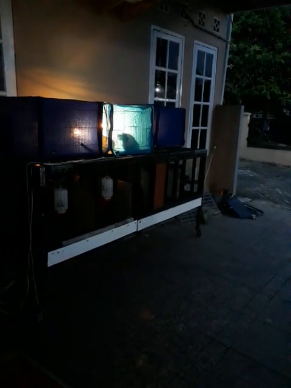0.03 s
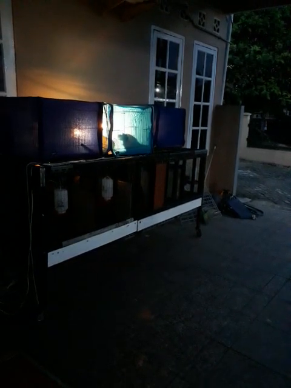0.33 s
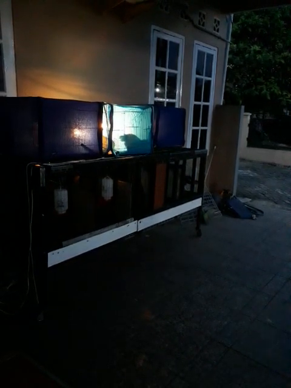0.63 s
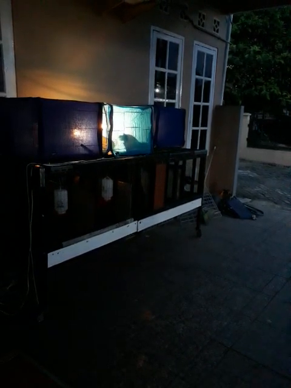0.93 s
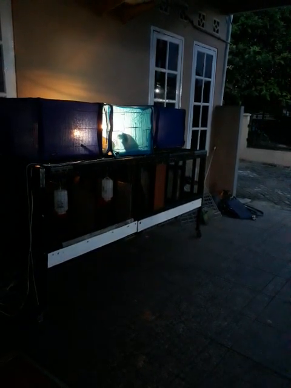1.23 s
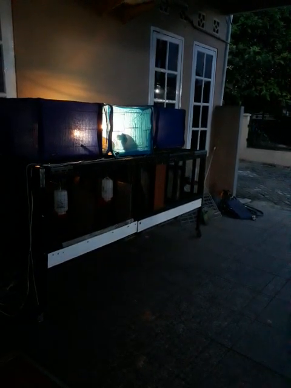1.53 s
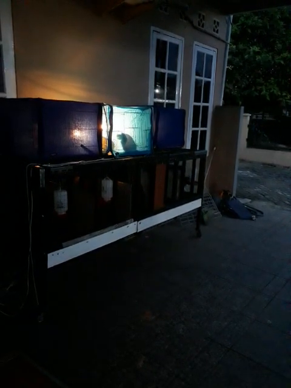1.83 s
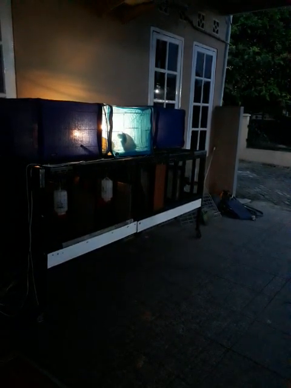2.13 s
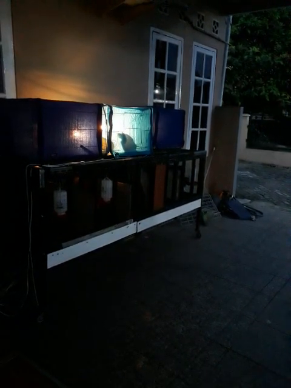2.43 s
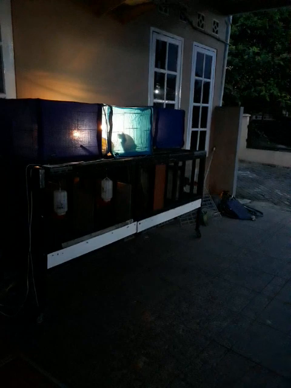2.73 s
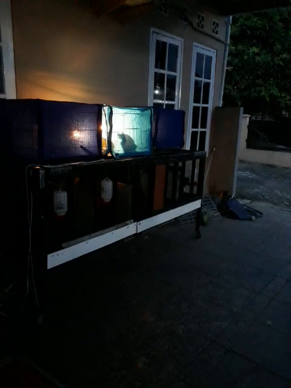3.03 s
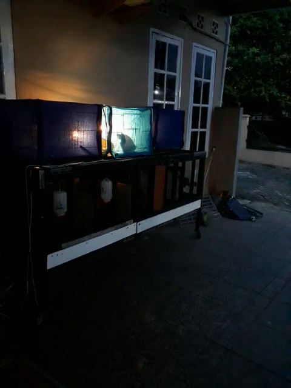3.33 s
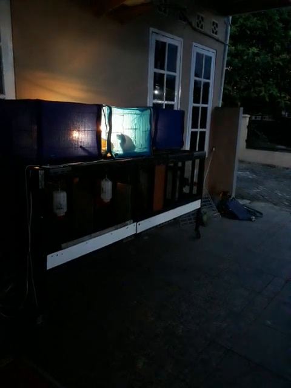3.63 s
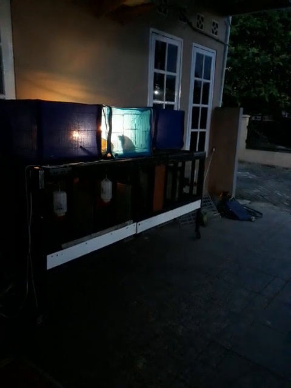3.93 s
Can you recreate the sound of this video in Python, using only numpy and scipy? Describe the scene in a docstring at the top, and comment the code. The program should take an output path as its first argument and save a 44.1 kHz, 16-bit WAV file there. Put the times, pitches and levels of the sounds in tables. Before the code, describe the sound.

Roosters crow in short rising calls, then a close one bursts in, loud and raspy.

```python
"""Roosters crowing in covered cages on a porch, heard from one microphone. One gives a stuttering crow of
five rising syllables, each hoarse at the start, while a farther bird crows lower in between. After some
scratching and a cluck, a rooster close to the microphone bursts in, squeaking and rasping. Each voice is
a syrinx sounding through a throat. Wall and roof ring over a steady bed of distant traffic."""
import sys
import numpy as np
from scipy import signal
from scipy.fft import rfft, irfft
from scipy.io import wavfile
from scipy.ndimage import uniform_filter1d, minimum_filter1d

SR = 44100
rng = np.random.default_rng(int(sys.argv[2]) if len(sys.argv) > 2 else 0)


def store_pcm(level_fs):
    """Save levels as 16-bit WAV."""
    pcm = np.round(np.clip(level_fs, -1, 1) * 32767).astype(np.int16)
    wavfile.write(sys.argv[1], SR, np.atleast_2d(pcm).T)


N = 176400  # 4 s
ATTACK_S, RELEASE_S = 0.0031, 0.02
BAND_LIMIT_HZ = 15700

# Spectrum of the rasp in every voice but the nearest: frequency_hz, relative_db
RASP_SPECTRUM = [(150, -51), (500, -22), (800, 4), (1200, -6), (1500, -8), (2100, 2), (2700, -8.5),
                 (3500, 4), (4100, -16.5), (5000, -5), (7000, -15), (10000, -41), (14500, -37.5)]


def amp(db):
    """Decibels to gain."""
    return 10 ** (np.asarray(db) / 20)


def unit_rms(x):
    """Scales a signal to rms 1."""
    return x / np.sqrt(np.mean(x ** 2) + 1e-20)


def value_at(points, hz):
    """Reads a table on a log-frequency axis."""
    f, value = np.transpose(points)
    return np.interp(np.log(hz + 1), np.log(f + 1), value)


def add(mix, start_s, sound):
    """Mixes a sound in at a time."""
    part = mix[max(round(start_s * SR), 0):][:len(sound)]
    part += sound[:len(part)]


def colour(x, spectrum):
    """Filters a sound by a spectrum in dB and scales it to rms 1."""
    gains = amp(value_at(spectrum, np.fft.rfftfreq(len(x), 1 / SR)))
    return unit_rms(irfft(rfft(x) * gains, len(x)))


def wander(size, hz):
    """Smooth random motion up to a rate, at about rms 1."""
    f = np.fft.rfftfreq(N, 1 / SR)
    return unit_rms(irfft(rfft(rng.standard_normal(N)) / (1 + (f / hz) ** 4), N))[:size]


def gate(t, start_s, end_s):
    """A note's quick onset and softer release."""
    return np.clip((t - start_s) / ATTACK_S, 0, 1) * np.clip((end_s - t) / RELEASE_S, 0, 1)


def yard():
    """Distant traffic rumble and a thin hiss, slightly unsteady in level."""
    # Outdoor background: frequency_hz, relative_db
    spectrum = [(20, -61), (45, -15), (75, -7), (101, -1), (188, 0), (368, -6.5), (482, -11), (570, -15.5),
                (900, -16), (1400, -20), (2150, -14), (2800, -24), (4100, -20.5), (5150, -19), (5800, -9.5),
                (6550, -24), (7400, -30.5), (8350, -21.5), (8900, -35), (9700, -55), (15500, -52)]
    level_db = -43.5 + .5 * wander(N, hz=12)
    return amp(level_db) * colour(rng.standard_normal(N), spectrum)


def syrinx(curve, throat, rasp, jitter, rasp_db, half_db, shimmer_db, beak=0):
    """Harmonics and weaker half-harmonics through a throat; roughness shakes the cycles and adds rasp."""
    times, *controls = np.transpose(curve)
    t = np.arange(times[0], times[-1], 1 / SR)
    hz, level_db, rough = (np.interp(t, times, control) for control in controls)
    rough, size = np.clip(rough, 0, 1), len(t)
    shake = jitter * rough * wander(size, hz=267) + 0.0046 * wander(size, hz=62)
    phase = 2 * np.pi * np.cumsum(hz * (1 + shake)) / SR
    multiples = np.arange(2, 36)[:, None] / 2
    partial_hz = multiples * hz
    beak_shift = (1051 / hz) ** beak  # with beak > 0 the throat's resonances sink as the pitch falls
    partial_db = value_at(throat, partial_hz * beak_shift) + half_db * (multiples % 1 > 0)
    gains = amp(partial_db) * (partial_hz < BAND_LIMIT_HZ)
    tone = (gains * np.cos(multiples * phase + multiples ** 2)).sum(0)
    tone /= np.sqrt((gains ** 2).sum(0) / 2)
    puffs = colour((1 + .7 * np.cos(phase)) * rng.standard_normal(N)[:size], rasp)  # one per cycle
    rasp_gain = amp(rasp_db) * rough ** 1.41
    voice = (tone + rasp_gain * puffs) / np.sqrt(1 + rasp_gain ** 2)
    shimmer = amp(shimmer_db * rough * wander(size, hz=110))
    return times[0], voice * shimmer * gate(t, times[0], times[-1]) * amp(level_db)


def fundamental(curve, flutter):
    """The lowest partial of a crow stays nearly pure even where the overtones break up."""
    times, pitch_hz, _, rough, level_db = np.transpose(curve)
    t = np.arange(times[0], times[-1], 1 / SR)
    shake = flutter * np.interp(t, times, rough) * wander(len(t), hz=113)
    hz = np.interp(t, times, pitch_hz) * (1 + shake)
    tone = np.sqrt(2) * np.sin(2 * np.pi * np.cumsum(hz) / SR)
    return times[0], tone * gate(t, times[0], times[-1]) * amp(np.interp(t, times, level_db))


def porch(x, early_db, tail_db):
    """Quick reflections off cage and wall, then a tail that dies faster in the treble."""
    # Ring of the wall and roof: frequency_hz, t60_s
    decay = [(300, 0.95), (1000, 0.45), (3000, 0.54), (6000, 0.36), (14000, 0.28)]
    t = np.arange(SR) / SR
    density = [[.02], [.12]]  # sparse early reflections, denser tail
    early_taps, tail_taps = rng.standard_normal((2, SR)) * (rng.random((2, SR)) < density) * (t > .002)
    early = early_taps * amp(-60 * t / 0.084)
    hz, when, bands = signal.stft(tail_taps * np.minimum(t / 0.049, 1), SR, nperseg=256)
    bands *= amp(-60 * when / value_at(decay, hz)[:, None])
    tail = signal.istft(bands, SR, nperseg=256)[1][:SR]
    echo = amp(early_db) * early / np.linalg.norm(early) + amp(tail_db) * tail / np.linalg.norm(tail)
    return (x + signal.fftconvolve(x, echo)[:N]) / np.sqrt(1 + np.sum(echo ** 2))


def stuttering_rooster():
    """Each syllable starts hoarse, clears as it rises, and drops in pitch at the end."""
    # The crow, one curve per syllable: time_s, pitch_hz, overtones_db, roughness, fundamental_db
    syllables = [
        [(0, 1015, -17, 0.25, -28.5), (.03, 1036, -22.5, 0.15, -37), (.1, 1100, -20, 0.17, -34.5),
         (.125, 1190, -25, 0.07, -32), (.155, 1214, -22, 0.38, -25.5), (.185, 875, -29, .6, -38)],
        [(.345, 954.4, -37, 0.84, -37), (.38, 984.5, -26.5, 0.87, -33.5), (.455, 988, -23.5, 0.6, -53),
         (.49, 1041, -21.5, 0.18, -33.5), (.54, 1074, -21, 0.06, -38), (.565, 1155, -21, 0.38, -30),
         (.605, 1164, -31, 0.39, -36.5), (.635, 845, -36, 0.3, -26)],
        [(.79, 941, -32, 1.1, -37), (.82, 989.4, -24, 0.47, -36), (.88, 1025, -25.5, 0.22, -45.5),
         (.91, 1035, -18.5, 0.02, -37), (.955, 1101, -23, 0.19, -36), (.99, 1118, -19, 0.22, -35.5),
         (1.02, 828, -34, 0.46, -16.5)],
        [(1.195, 959, -31, 1.08, -46), (1.245, 974, -23.5, 0.49, -30.5), (1.282, 983.6, -19.5, 0, -29.5),
         (1.322, 987.6, -28.5, .1, -43), (1.355, 1059, -19.5, 0.19, -43), (1.38, 1071, -21.5, 0.09, -30.5),
         (1.415, 776, -38, 0.56, -29.5)],
        [(1.96, 771, -39, 0.75, -33), (1.98, 828, -34.5, 0.71, -29), (2.052, 890, -33.5, 0, -28.5),
         (2.122, 929, -28.5, 0.22, -33.5), (2.2, 989.5, -21.5, 0.01, -28), (2.28, 1023, -24.5, 0.08, -47),
         (2.325, 1057, -18.5, 0.04, -38.5), (2.385, 1091, -22.5, 0.15, -30.5), (2.425, 794, -40, 0.3, -31)],
    ]
    # Throat resonances: frequency_hz, relative_db
    throat = [(600, -38), (1050, -63), (1650, -24), (2000, 6), (2250, 2.5), (2700, -8.5), (2980, -9),
              (3200, 4.5), (3500, 2), (3950, -25), (4500, 2), (5000, -9), (5650, -10), (6400, -8),
              (7200, -11.5), (7900, -21), (10000, -43.5), (14000, -37.5), (16000, -43)]
    # Brightness above 4 kHz, one value per syllable: treble_db
    brightness = [-1.5, -2, 0, 0.5, 3]
    out = np.zeros(N)
    for curve, treble_db in zip(syllables, brightness):
        tilted_throat = [(hz, db + treble_db * (hz > 4000)) for hz, db in throat]
        add(out, *syrinx(np.array(curve)[:, :-1], tilted_throat, RASP_SPECTRUM,
                         jitter=0.0457, rasp_db=4.5, half_db=-21, shimmer_db=2.77, beak=0.35))
        add(out, *fundamental(curve, flutter=0.073))
    return porch(out, early_db=1.0, tail_db=-3)


def glide(start_s, length_s, first_hz, last_hz, level_db, rough, peak, bend):
    """Curve of a swelling note; peak and bend are the shares of its length and glide when loudest."""
    onset_db = -13.5
    return [(start_s, first_hz, level_db + onset_db, rough),
            (start_s + length_s * peak, first_hz + bend * (last_hz - first_hz), level_db, rough),
            (start_s + length_s, last_hz, level_db + onset_db / 2, rough)]


def far_rooster():
    """Lower, wavering notes from farther off, reaching the microphone mostly by reflection."""
    # Rising notes: start_s, length_s, first_hz, last_hz, level_db
    notes = [(0.067, .18, 679, 920, -27.5), (.42, 0.19, 700, 894, -30.5), (.725, 0.14, 683.5, 891, -27.5),
             (1.002, .17, 680.4, 900.6, -29.5), (1.347, 0.15, 665, 867, -28), (1.683, .17, 659.3, 879, -30),
             (2.216, .33, 615, 755.6, -32)]
    # Throat resonances heard at a distance: frequency_hz, relative_db
    throat = [(600, 0), (850, 2), (1350, -21), (1800, -5.5), (2600, -12), (3500, -19.5), (4500, -24.5),
              (7000, -20.5), (10000, -54)]
    out = np.zeros(N)
    for note in notes:
        curve = glide(*note, rough=0.16, peak=.65, bend=.8)
        add(out, *syrinx(curve, throat, RASP_SPECTRUM,
                         jitter=0.127, rasp_db=4.5, half_db=-36, shimmer_db=15))
    return porch(out, early_db=4.5, tail_db=-2)


def scratching():
    """Feet and feathers scrape the cages: bursts of fine grains in a broad resonance."""
    # Scratches and rustles: start_s, decay_s, centre_hz, level_db
    scratches = [(.655, .05, 5160, -33), (0.684, 0.091, 4130, -29.5), (1.567, 0.018, 4230, -39),
                 (1.803, 0.11, 3980, -39), (1.97, 0.22, 3900, -40.5), (2.502, 0.06, 4420, -29.5),
                 (2.742, 0.0091, 3200, -35), (2.881, 0.051, 4300, -48.5), (3.049, 0.041, 4080, -38.5),
                 (3.15, 0.031, 4170, -36.5)]
    # Resonance of a scrape: multiple_of_centre, relative_db
    resonance = [(.2, -18), (.62, -13.5), (.84, -5.5), (.96, 0.5), (1.04, 4.5), (1.17, -7.5), (1.8, -29),
                 (2.3, -52)]
    out = np.zeros(N)
    for start_s, decay_s, centre_hz, level_db in scratches:
        t = np.arange(0, 2 * decay_s, 1 / SR)
        grains = rng.standard_normal(N)[:len(t)] * amp(3 * wander(len(t), hz=250))
        spectrum = [(centre_hz * multiple, db) for multiple, db in resonance]
        envelope = np.minimum(t / 0.0088, 1) * np.exp(-(t / decay_s) ** 3)
        add(out, start_s, colour(grains, spectrum) * amp(level_db) * envelope)
    return porch(out, early_db=-3, tail_db=-6.5)


def cluck():
    """One soft, low cluck: a short, slightly rising note with little rasp."""
    # Throat resonances: frequency_hz, relative_db
    throat = [(670, 3.5), (1350, -8.5), (2050, -7), (2700, -25), (3450, -5), (4100, -14), (4800, -13),
              (7000, -45)]
    curve = glide(start_s=3.254, length_s=.085, first_hz=675, last_hz=705, level_db=-36.5,
                  rough=.12, peak=.45, bend=.6)
    out = np.zeros(N)
    add(out, *syrinx(curve, throat, RASP_SPECTRUM, jitter=.05, rasp_db=-7, half_db=-40, shimmer_db=4.5))
    return porch(out, early_db=-13, tail_db=-8.5)


def near_rooster():
    """Close to the microphone, a squeak opens a loud note that turns to rasp over a firm fundamental."""
    # The crow, one curve per syllable: time_s, pitch_hz, overtones_db, roughness, fundamental_db
    syllables = [
        [(3.545, 1068, -27.5, 0.38, -72), (3.562, 1043, -12.5, 0.34, -12.5), (3.585, 1057, -10.5, 0.15, -11),
         (3.65, 1040, -2, .08, -6.5), (3.668, 1002, -25.5, 0.67, -10.5), (3.695, 1004, -15, 1.06, -6.5),
         (3.722, 1014, -20.5, 1.1, -24.5), (3.765, 1007, -25.5, .9, -7.5)],
        [(3.905, 1067, -39, 0.6, -64), (3.925, 1116, -26, 0.9, -17), (3.955, 1101, -21, .8, -28),
         (3.978, 1039, -15, .3, -9.5), (4.02, 1061, -16, 0, -9.5)],
    ]
    # Thin squeaks of the throat: start_s, length_s, first_hz, last_hz, level_db
    squeaks = [(3.532, 0.045, 3040, 2334, -23), (3.7, 0.0674, 2172, 2327, -20.5),
               (3.894, 0.0488, 2705, 3286, -23)]
    # Throat resonances in crow and squeak, and the spectrum of the rasp: frequency_hz, relative_db
    crow_throat = [(500, -34), (1000, 2), (1550, -10), (2100, 2.5), (3100, -22), (3650, 2.5), (4200, -7),
                   (4750, 8), (5250, 7.5), (5750, -23), (6300, 1), (6800, 0), (7500, -32), (8400, -18.5),
                   (11000, -34.5), (15000, -31)]
    squeak_throat = [(2500, 17.5), (3300, -0.5), (5200, 17.5), (6600, -7), (8500, -34), (15000, -45)]
    rasp = [(150, -62), (500, -40), (1000, -9), (1300, -15), (1600, -6.5), (1800, -16), (2250, 3.5),
            (2950, -15.5), (3700, -2), (4400, -1.5), (5200, -2.5), (6400, 2.5), (7500, -17.5), (11000, -31),
            (15000, -31)]
    upper, low = np.zeros((2, N))
    for curve in syllables:
        add(upper, *syrinx(np.array(curve)[:, :-1], crow_throat, rasp,
                           jitter=0.033, rasp_db=4, half_db=-14, shimmer_db=2.4))
        add(low, *fundamental(curve, flutter=.008))
    for squeak in squeaks:
        curve = glide(*squeak, rough=0.28, peak=0.394, bend=0.96)
        add(upper, *syrinx(curve, squeak_throat, rasp,
                           jitter=0.058, rasp_db=3, half_db=-34, shimmer_db=7.5))
    return porch(upper, early_db=-1, tail_db=-10.5) + porch(low, early_db=-11, tail_db=-15)


def scene():
    """All the birds over the outdoor background, in mono."""
    return (stuttering_rooster() + far_rooster() + cluck() + near_rooster() + scratching() + yard())[None]


def record(dry):
    """The recorder's fast limiter holds the loudest peaks, and a low-pass cuts the highest treble."""
    ceiling, window = .98, 220  # share of full scale; samples (5 ms)
    gain = np.minimum(1, ceiling / (abs(dry[0]) + 1e-9))
    limited = dry * uniform_filter1d(minimum_filter1d(gain, size=window), size=window)
    lowpass = signal.firwin(511, BAND_LIMIT_HZ, window=("kaiser", 9), fs=SR)
    return signal.oaconvolve(limited, lowpass[None], "same")


dry = scene()
out = record(dry)
store_pcm(out)
```